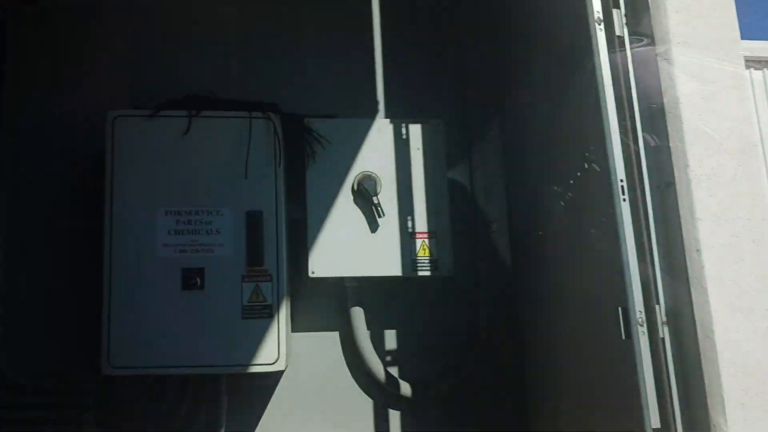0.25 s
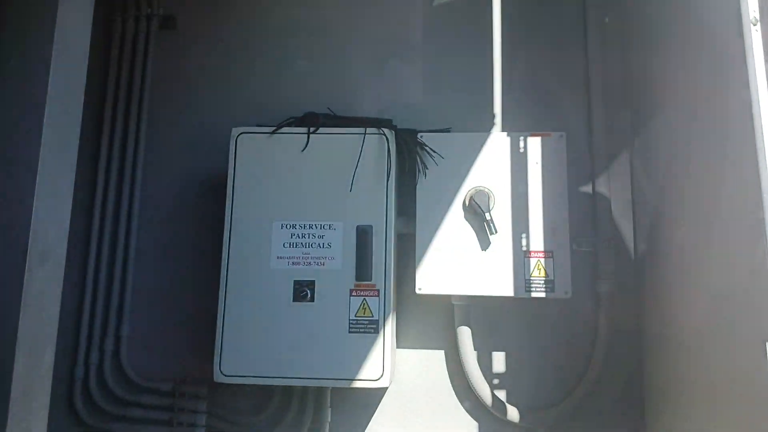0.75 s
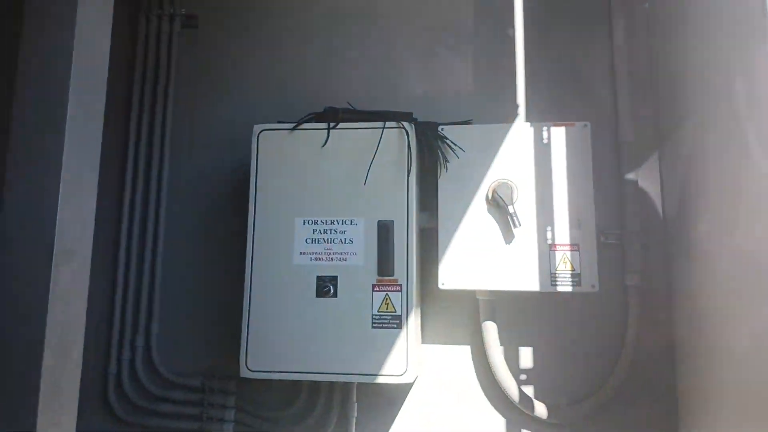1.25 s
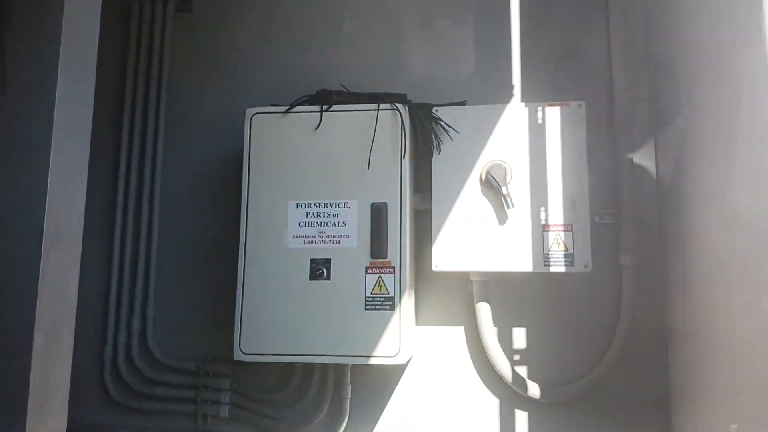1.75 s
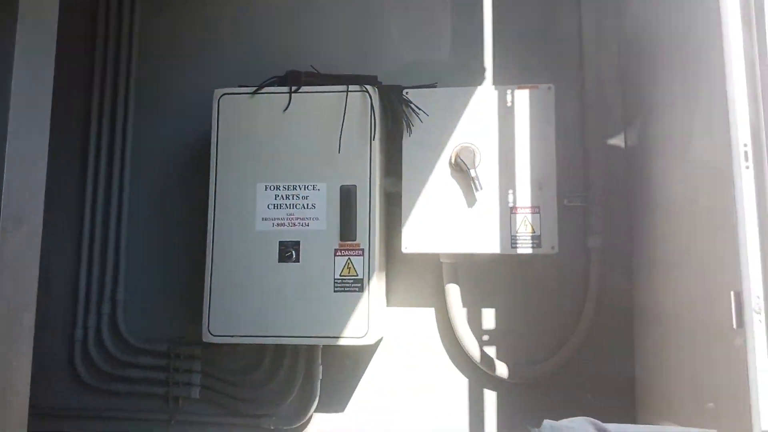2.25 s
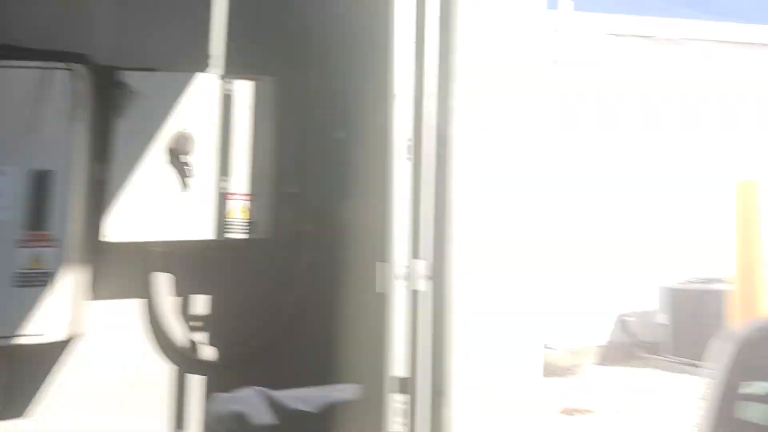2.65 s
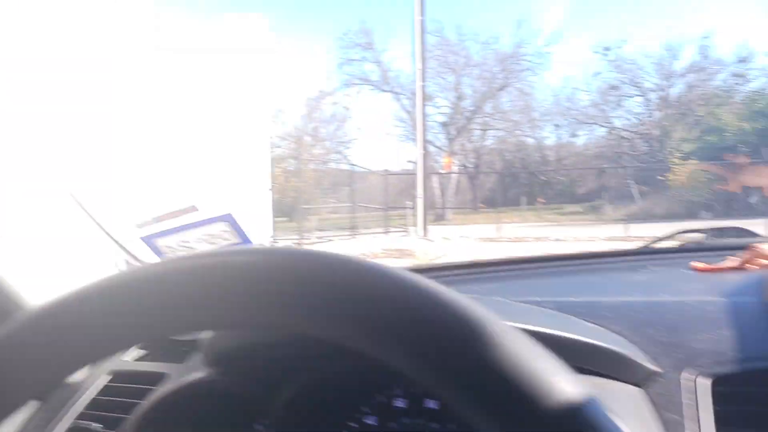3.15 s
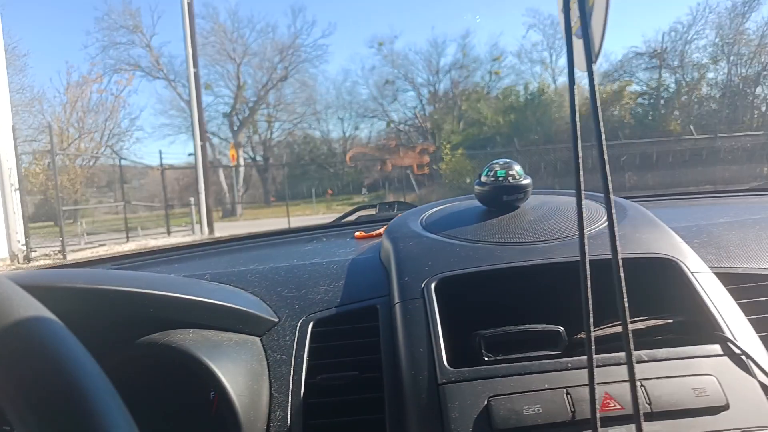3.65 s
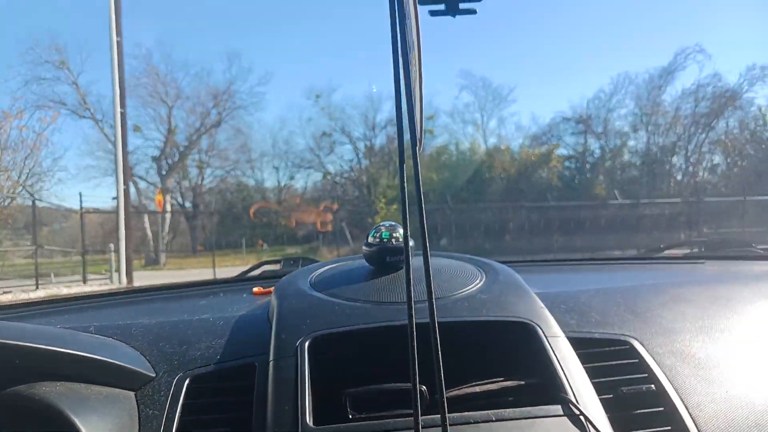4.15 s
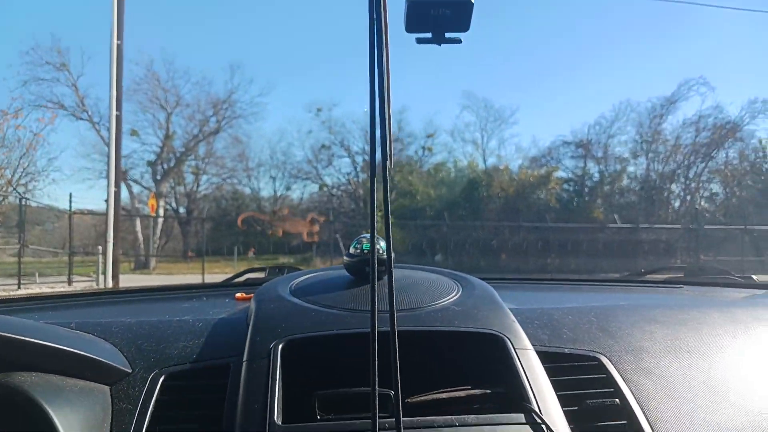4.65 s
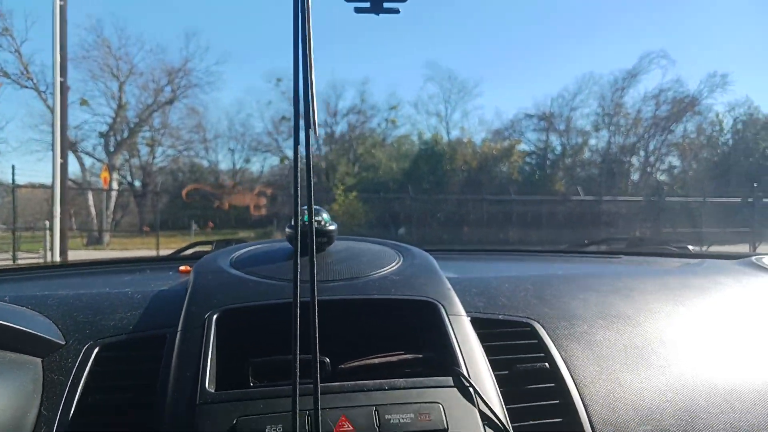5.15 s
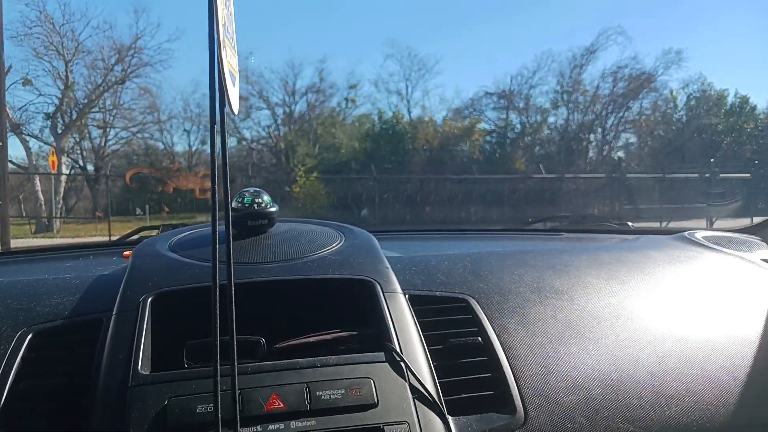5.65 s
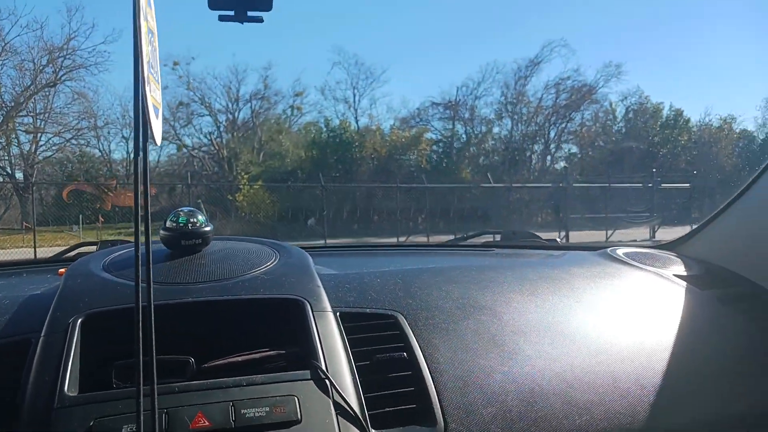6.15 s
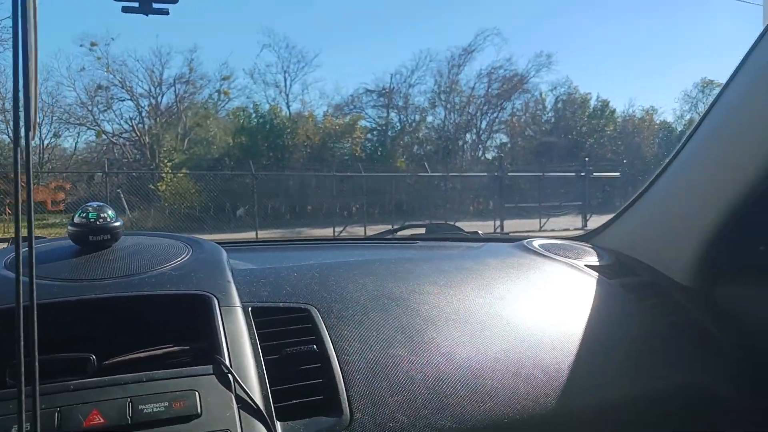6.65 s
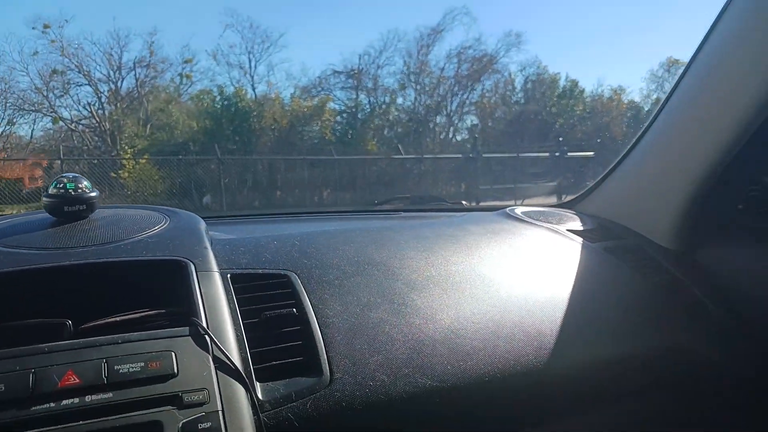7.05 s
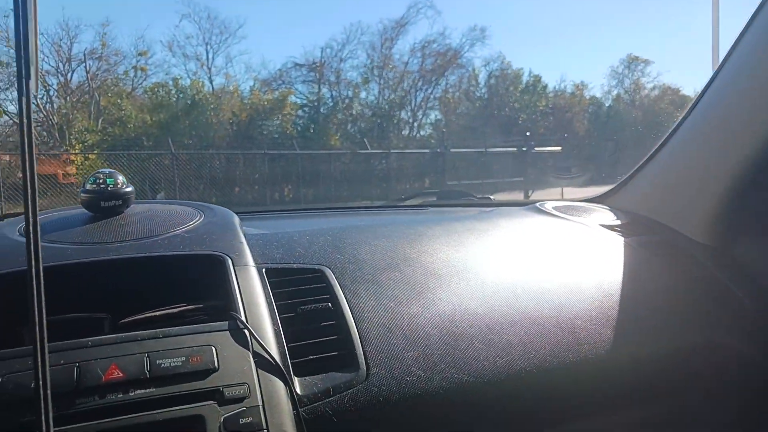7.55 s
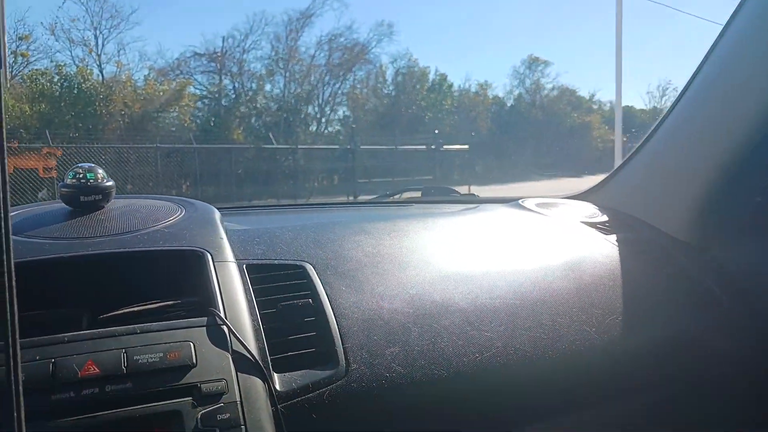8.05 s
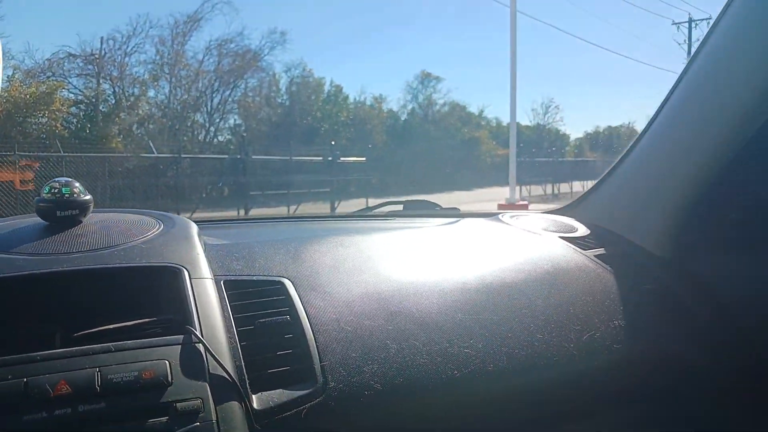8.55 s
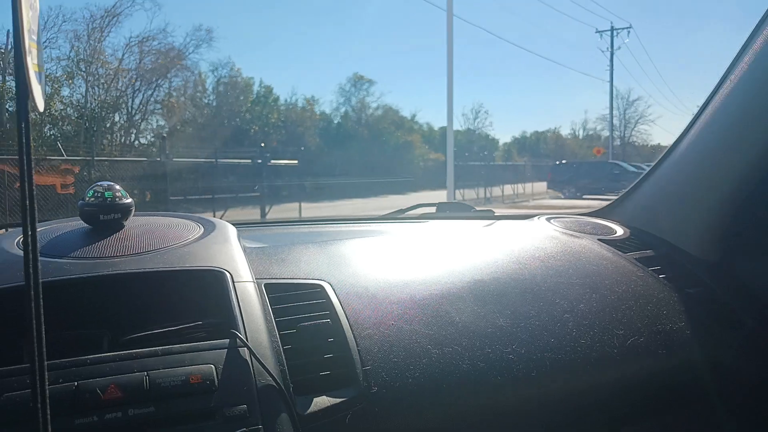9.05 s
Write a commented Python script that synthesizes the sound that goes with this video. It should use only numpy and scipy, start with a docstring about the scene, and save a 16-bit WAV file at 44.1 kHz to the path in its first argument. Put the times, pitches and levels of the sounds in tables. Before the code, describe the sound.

Heard on a hand-held phone inside a closed car: powerful dryer blowers drive a deep, booming, muffled roar with hiss past the window seals. After about three seconds it weakens as the car rolls out, with breathy gusts and a faint falling hum. The end is very quiet: soft hiss, low drone, a few dry plastic ticks and a hand rubbing the wheel.

```python
"""Car-wash dryer heard from inside the car

Blower jets drive the closed cabin: filtered noise gives the air boom, the roof, door and glass resonances
and the hiss past the seals, heard at two partly coherent ports of a hand-held phone.
As the car rolls out these fade through seal gusts and a sagging sine hum, leaving road drone, microphone
hiss, decaying thumps, grainy friction of a hand on the wheel and dry ticks made of noise and decaying sines."""
import sys
import numpy as np
from scipy import signal
from scipy.fft import rfft, irfft
from scipy.io import wavfile
from scipy.ndimage import uniform_filter1d

SR = 44100
rng = np.random.default_rng(int(sys.argv[2]) if len(sys.argv) > 2 else 0)


def generate_wav(signal):
    """Clip the signal to [-1, 1] and save it as 16-bit WAV at the path in sys.argv[1]."""
    frames = np.transpose(np.atleast_2d(signal))
    scaled = np.clip(frames, -1, 1) * 32767
    pcm = np.round(scaled).astype(np.int16)
    wavfile.write(sys.argv[1], SR, pcm)


N = 409688
T = np.arange(N) / SR
HZ = np.maximum(np.arange(N // 2 + 1) * SR / N, 1.)

# In mode and colour tables level_db is relative: air() sets the layer's own level.
# The two ports: hz, coherence (0-1), left_lead_rad, left_minus_right_db
PORTS = [(30, .98, .85, -2.8), (58, .98, .55, -1), (90, .9, .15, 0), (128, .98, -.15, -4.5),
         (180, .95, .4, -4), (250, .85, .35, .5), (350, .75, .3, -2.5), (500, .47, .3, -4),
         (700, .2, 1.5, -3), (1100, .14, 3.1, 0), (7000, .07, 3.1, -2), (9000, 0, 3.1, 2),
         (12500, 0, 3.1, 6), (15800, 0, 3.1, 3)]
# Nozzles moved behind the car: time_s, share (0-1)
BEHIND = [(3.15, 0.31), (3.7, 0.52), (4.6, 0.96), (5.4, 0.68)]
# Jets striking the car: time_s, panels_db, seals_db
JETS = [(0, 0, -1), (.5, -.2, 0.7), (1.2, 1, -3), (1.8, -1, -1.5), (2.3, -3.5, -6.5), (2.7, -9.5, -9.5),
        (3.15, -13.5, -16), (3.55, -15.5, -19.5), (4.0, -23, -18.5), (4.7, -29, -33.5), (5.3, -36, -28),
        (6.5, -56, -65)]
# Roar of the blowers all round the car: time_s, level_db
ROAR = [(0, -3.5), (.5, -4), (1.2, 1.3), (1.9, -4), (2.7, -2.5), (3.15, -2.6), (3.55, -3), (4.0, -4.5),
        (4.3, -5.5), (4.7, -6.5), (5.23, -6), (5.38, -11), (5.75, -14.5), (6.1, -15), (6.5, -18),
        (7.1, -22.5), (7.5, -23), (8.1, -25.5), (8.5, -37), (9.29, -32.5)]
# Drive of each layer: jets_db, db_per_jet_db, roar_db, db_per_roar_db, behind_lift_db, road_db
DRIVE = {"boom": (-23, 0.5, -22.5, 1.17, 2, -43.5), "roof": (-21, 0.62, -34.5, 0.96, 0.5, -64.5),
         "upper roof": (-21.5, 0.94, -41, 7, .1, -73.5), "door": (-29.5, 1.4, -44.5, 1.27, 11, -67),
         "glass": (-33.5, 2.07, -42.5, 0.85, 4, -77), "low hiss": (-50.5, 1, -56, 1.5, 3.5, -110),
         "high hiss": (-54.5, 0.9, -57.5, 1, -8, -110), "top hiss": (-58, 1, -77.5, 4, -1.5, -110)}

# Cabin air modes, nozzles near: hz, width_hz, level_db
BOOM_MODES = [(46.2, 23, -12), (59.8, 35.4, 0), (82, 31, -17.5)]
# Cabin air modes, nozzles behind: hz, width_hz, level_db
BOOM_BEHIND_MODES = [(41, 30, -3.5), (60, 20, -6.5), (80, 25, -19)]
# Brief swells and sags of the boom: start_s, length_s, lift_db
BOOM_SWELLS = [(0.237, 0.027, 5.5), (0.644, 0.05, 5.5), (2.058, 0.028, 3), (2.905, 0.35, 3.5),
               (3.625, 0.059, 1), (3.882, 0.18, 4), (4.41, 0.043, 4), (4.623, 0.12, 7), (5.053, 0.14, 2.5),
               (5.572, 0.14, 4.5), (5.76, 0.031, -10), (5.864, 0.37, 7.5), (6.73, 0.073, 5.5),
               (6.995, 0.094, -6), (7.303, 0.14, 4), (8.126, 0.091, 6), (8.51, .05, -4.5), (8.62, 0.027, 7)]
SWELL_EDGE_S = 0.082  # time for the lift to fall to a tenth
# Roof mode, nozzles near: hz, width_hz, level_db
ROOF_MODES = [(120.9, 28, 0)]
# Roof modes, nozzles behind: hz, width_hz, level_db
ROOF_BEHIND_MODES = [(114, 33, -1), (137, 28, -2.5)]
# Upper roof modes: hz, width_hz, level_db
UPPER_ROOF_MODES = [(155.5, 33.5, -1.5), (179.1, 28.4, 0.5)]
# Door modes, nozzles near: hz, width_hz, level_db
DOOR_MODES = [(214.3, 23, -1), (244.5, 38, -0.16), (286.4, 66, -1.1)]
# Door modes, nozzles behind: hz, width_hz, level_db
DOOR_BEHIND_MODES = [(225, 6.8, -5), (257, 67, -2), (300, 63, -6)]
JETS_REACH_DOOR_S, DOOR_EARLY_DB, ROOF_EARLY_DB = 0.82, -6.5, 4  # the jets start on the roof
# Window glass modes, nozzles near: hz, width_hz, level_db
GLASS_MODES = [(379, 101, 3.5), (440, 164, -1), (570, 210, -12), (730, 300, -27.5)]
# Window glass modes, nozzles behind: hz, width_hz, level_db
GLASS_BEHIND_MODES = [(375, 200, -2), (458, 67, -1.5), (536, 87, -3.5), (643, 53, -11.5), (706, 123, -13.5)]
# Tyre drone in the floor: hz, width_hz, level_db
ROAD_MODES = [(232, 19, 3.5), (300, 30, 4.5), (590, 110, -3.5)]
ROAD_DB = -67

# Low seal hiss, nozzles near: hz, level_db (per Hz)
LOW_HISS = [(500, -25.5), (750, -8.5), (1100, -4.5), (1500, -7), (2000, -9.5), (2600, -17), (4000, -34)]
# Low seal hiss modes, nozzles behind: hz, width_hz, level_db
LOW_HISS_BEHIND_MODES = [(774, 320, 13.5), (1300, 600, -11.5), (2620, 580, -15)]
# High seal hiss, nozzles near: hz, level_db (per Hz)
HIGH_HISS = [(1500, -19), (2300, 0), (3000, 2), (3800, 1), (4600, 0.5), (5500, -9.5), (8000, -32)]
# High seal hiss modes, nozzles behind: hz, width_hz, level_db
HIGH_HISS_REAR_MODES = [(2560, 1300, -6), (3730, 1500, -1.5), (4520, 930, -6)]
# Ridges in the hiss as nozzles pass the rear side windows: hz, width_hz, level_db
RIDGE_MODES = [(2870, 630, -1), (4400, 400, -4)]
RIDGE_S, RIDGE_HOLD_S, RIDGE_EDGE_S, RIDGE_DB = 3.5, 0.74, 0.61, -66.5  # edge: s per 20 dB
# Top seal hiss: hz, level_db (per Hz)
TOP_HISS = [(4000, -28), (5200, -1), (6500, -1.5), (7300, -5), (8200, -10), (10000, -14.5), (12300, -24),
            (15800, -30)]
# Sizzle above the top hiss: hz, level_db (per Hz)
SIZZLE = [(8000, -19.5), (10000, -2.5), (12500, 0), (15800, -7.5)]
SIZZLE_START_DB, SIZZLE_FADE_DB_PER_S = -64.5, 8.5
# Brief spits of treble: time_s, lift_db
SPITS = [(.664, 9), (0.8472, 8), (.958, 4.5), (1.1154, 11.5), (1.172, 8), (1.202, 7), (1.285, 1),
         (1.313, 7), (1.403, 6), (1.684, 7), (1.864, 4)]
SPIT_DECAY_S = 0.063  # time for the lift in dB to fall to a thousandth
# Left minus right: at first, added with the nozzles behind, added after OUTSIDE_S
HISS_PAN_DB, HISS_PAN_BEHIND_DB, HISS_PAN_OUTSIDE_DB, OUTSIDE_S = -0.5, 4, 1.5, 4.8

# Microphone hiss: hz, level_db (per Hz)
MIC_HISS = [(700, -6), (1000, -0.5), (2000, -9), (6000, -12), (10000, -9.5), (11500, -10), (13200, -6),
            (15800, -8)]
# Balance of the microphone hiss: hz, left_minus_right_db
MIC_HISS_PAN = [(900, 8), (5000, 4.5), (9000, 7), (13000, 6)]
# Microphone hiss, rising until 6 s and then sinking slightly: time_s, level_db
MIC_HISS_LEVEL = [(3.5, -92), (4.6, -78), (6.0, -73.5), (8.0, -76), (9.2, -80.5)]
# Faint electronic tone, level before panning: hz, level_db (over the hiss)
WHINE = [(11712, -23)]

# Trim ticks, dull and top relative to the bright burst:
# start_s, level_db, left_minus_right_db, dull_db, top_db, t60_s
TICKS = [(4.2924, -47.5, -15, -5.5, -9, 0.008), (5.467, -79, 4, 10, -10, .06),
         (6.0516, -68.5, 8, 12.5, -15, 0.045), (6.175, -81, 11, 15, -7, .045),
         (6.3691, -77, 3.5, -8, 9, 0.086), (6.5974, -73, 6, -9, 7, .07), (7.023, -61, 6, -11, 2, .034),
         (7.266, -69, 5.5, 2, 6, .07), (7.498, -61, 0, -22, -6, .04), (7.5957, -77, 4, 7, -3, 0.044),
         (7.7902, -45, 0.5, -11, 5, 0.044), (7.8394, -73.5, 6, 5, -9, 0.033), (7.925, -59, 4, -2, 6, 0.062),
         (8.082, -70, 2, -2, -2, 0.054), (8.185, -71, 8, -5, -10, .03), (8.192, -66.5, 7, -24, 7, 0.06),
         (8.298, -79, -1, -5, -14, .04), (8.371, -45.5, 0, -15, 6.5, 0.043),
         (8.502, -74.5, 3, -18, 11, 0.049), (9.126, -74.5, 1, -2, -7, .06)]
# Bright part of a tick: hz, level_db (per Hz)
TICK_BRIGHT = [(1500, -22), (3000, 3), (4000, 3.5), (6000, 2), (8000, -0.5), (10000, -3.5)]
# Top part of a tick: hz, level_db (per Hz)
TICK_TOP = [(6500, -25), (8500, -3), (10500, -4), (13000, 0), (15800, -3)]
# Dull modes of a tick: hz, width_hz, level_db
TICK_DULL_MODES = [(646, 190, 6.5), (960, 390, -2), (1476, 120, -0.5), (1700, 500, -5.5), (2300, 600, -10)]
# Cabin response after a tick: hz, width_hz, level_db
TICK_TAIL_MODES = [(1000, 900, 2), (2300, 1600, 1), (4300, 3000, 0)]
# Trim modes before scatter: hz, level_db (relative), t60_s (at most the tick's own)
TRIM_MODES = [(1480, -20, .05), (3300, -8, .03), (4900, -5, .02), (6850, 0, 0.043), (9100, -2, .011),
              (10780, -10, .04), (12500, -3, .04), (14620, -5, .024)]
TRIM_DB, TRIM_SCATTER_DB, TRIM_DETUNE = -7, 3.5, 0.044  # each tick strikes the modes differently
CRACK_T60_S, CRACK_DB = .003, 4
TICK_TAIL_T60_S, TICK_TAIL_DB, TICK_RIGHT_RISE_S = 0.24, -20, 0.0013
TICK_BOUNCE_S, TICK_BOUNCE_DB = 0.0029, -9  # the trim lands a second time

# Gusts along the rear seals: start_s, length_s, rise_s (per 20 dB), lower_db, upper_db, whistle_db
GUSTS = [(4.47, .2, .45, -65, -80, -67), (4.74, .27, .5, -59, -64, -64), (4.84, .07, .15, -62, -59, -72),
         (4.96, .05, .1, -60, -63, -66), (5.155, .02, .06, -53, -60, -62), (5.2, .07, .05, -65, -69, -64),
         (5.3, .1, .05, -67, -84, -73), (5.47, .03, .04, -63, -76, -72), (5.55, .1, .08, -64, -73, -72),
         (5.75, .22, .2, -74, -90, -76), (6.0, .28, .15, -72, -88, -77), (6.052, .015, .02, -66, -72, -72),
         (6.19, .03, .03, -73, -84, -84)]
LOWER, UPPER, WHISTLE = 3, 4, 5  # columns of the gusts
# Lower gap modes: hz, width_hz, level_db
GUST_LOWER_MODES = [(776, 460, 2), (1150, 230, -1.2), (1340, 200, -0.5), (1630, 150, -5)]
# Upper gap modes: hz, width_hz, level_db
GUST_UPPER_MODES = [(1640, 360, -1), (1870, 150, 1.5), (2040, 260, -5)]
# Whistle band of the gusts: hz, width_hz, level_db
GUST_WHISTLE_MODES = [(2700, 1000, -2), (3620, 860, 0), (4220, 700, -6.5), (5460, 700, -12.5)]
GUST_FALL_S, GUST_FALL_PER_LENGTH = 0.019, 0.98  # 20 dB down after this, longer gusts die slower
GUST_LOW_HISS_DB, GUST_ROOF_DB = 5, 18.5  # over the upper modes
GUST_TOP_HISS_DB = -16  # over the whistle band

# Blower hum sagging as the car leaves; rise and fall in s per 20 dB
HUM_PEAK_S, HUM_HOLD_S, HUM_RISE_S, HUM_FALL_S = 5.65, 1.05, 1.4, .5
HUM_HZ, HUM_SAG_HZ_PER_S, HUM_DB = 274, 28, -54

# Soft thumps of a door panel: start_s, peak_db
THUMPS = [(6.053, -41), (7.599, -55), (7.838, -48), (8.029, -51)]
THUMP_HZ, THUMP_T60_S = 477, 0.088
# The panel drones on the road; edge in s per 20 dB
PANEL_S, PANEL_HOLD_S, PANEL_EDGE_S, PANEL_DB, PANEL_WIDTH_HZ = 6.83, 1.12, 0.62, -60.5, 125

# Strokes of the hand on the wheel, before panning: start_s, length_s, bright_db, dull_db
STROKES = [(6.624, .07, -76, -81), (6.725, 0.1, -71, -80.5), (6.873, .2, -66, -74.5),
           (6.992, 0.049, -79, -71.5), (7.1, 0.16, -69.5, -76.5), (7.268, 0.052, -69, -71),
           (7.361, 0.027, -62.5, -63.5), (7.424, 0.046, -70, -73), (7.501, 0.023, -67.5, -72)]
STROKE_RISE_S, STROKE_FALL_S = 0.049, 0.065  # per 20 dB
# Bright friction: hz, level_db (per Hz)
RUB_BRIGHT = [(4000, -18.5), (6500, -9), (9000, -6), (11000, -7.5), (13000, -4), (15800, -9.5)]
# Dull friction modes: hz, width_hz, level_db
RUB_DULL_MODES = [(1090, 940, -6.5), (1850, 790, -7), (2580, 470, -7), (3078, 330, -9), (3940, 1700, -5.5),
                  (6600, 1800, -11)]
# Skin catching on the rim, before panning: start_s, level_db
SNAGS = [(6.993, -66), (7.023, -58.5), (7.268, -76), (7.3, -71), (7.361, -66), (7.385, -62), (7.497, -62),
         (7.525, -72)]
SNAG_FALL_S = 0.015  # per 20 dB
# Rim modes rung by the catches: hz, width_hz, level_db
RIM_MODES = [(1880, 160, 2), (2640, 150, -11), (3100, 250, 2), (3760, 300, -2), (5640, 500, -8),
             (6640, 300, -7)]

MIC_LOW_HZ, TOP_HZ = 35.7, 15750
OVERLOAD = .62  # full scale is 1


def undb(db):
    """Amplitude ratio is ten to the power of decibels over twenty."""
    return 10 ** (np.asarray(db) / 20)


def over_hz(table):
    """Linear interpolation of a table's columns on a log-frequency axis."""
    hz, *columns = np.transpose(table)
    return [np.interp(np.log(HZ), np.log(hz), c) for c in columns]


def over_time(table):
    """Linear interpolation of a table's columns in time."""
    s, *columns = np.transpose(table)
    return [np.interp(T, s, c) for c in columns]


def modes(table):
    """Resonance: squared second-order responses add as powers; width is between the -6 dB points."""
    power = 0
    for hz, width, db in table:
        detuning = (HZ - hz ** 2 / HZ) / width
        power = power + undb(2 * db) / (1 + detuning ** 2) ** 2
    return np.sqrt(power)


def colour(table):
    """Spectral shaping: 40 dB down an octave below the table, level beyond its upper end."""
    low_hz, low_db = table[0]
    return undb(over_hz([(low_hz / 2, low_db - 40)] + list(table))[0])


def walk(rate):
    """Random modulation: levels held for 1 / rate s, smoothed twice, with spread near 1."""
    k = int(SR / rate)
    held = np.repeat(rng.standard_normal(N // k + 1), k)
    return 1.3 * uniform_filter1d(uniform_filter1d(held, k), k)[:N]


def air(gain, steady_s=0.12, flicker_db=0., flicker_hz=12):
    """Partial coherence: coloured noise at two ports, mid rms 1 over steady_s before its flicker."""
    coherence, lead, pan_db = over_hz(PORTS)
    coherence = np.clip(coherence, 0, 1)
    shared, separate = gain * rfft(rng.standard_normal((2, N)))
    right = coherence * np.exp(-1j * lead) * shared + np.sqrt(1 - coherence ** 2) * separate
    pair = irfft([shared * undb(pan_db / 2), right * undb(-pan_db / 2)], N)
    k = int(steady_s * SR)
    power = uniform_filter1d(uniform_filter1d(pair.mean(axis=0) ** 2, k), k)
    return pair / np.sqrt(power) * undb(flicker_db * walk(flicker_hz))


def sides(pan_db):
    """Level difference: gains of the left and right port, half the decibels each way."""
    return undb(np.outer([.5, -.5], pan_db))


def shifting(near, behind, pan_db=0., **noise):
    """Power crossfade: one layer changes colour as the nozzles pass to the rear."""
    share = np.clip(over_time(BEHIND)[0], 0, 1)
    front = np.sqrt(1 - share) * air(near, **noise)
    rear = np.sqrt(share) * air(behind, **noise) * sides(pan_db)
    return front + rear


def patchy(table, **noise):
    """Independent modulation: resonances swell and fade separately, rms near 1 in all."""
    weights = undb([db for *_, db in table]) * np.sqrt([width for _, width, _ in table])
    layers = sum(w * air(modes([mode]), **noise) for w, mode in zip(weights, table))
    return layers / np.linalg.norm(weights)


def surge(start, length, rise, fall):
    """Exponential envelope: rises, holds 1 for length s and falls; rise and fall are s per 20 dB."""
    before, after = (start - T) / rise, (T - start - length) / fall
    return undb(-20 * np.maximum(np.maximum(before, after), 0))


def driven(layer):
    """Power addition: jets, roar and road drive a layer as independent sources."""
    (panels_db, seals_db), (roar_db,) = over_time(JETS), over_time(ROAR)
    jet_db = seals_db if "hiss" in layer else panels_db
    full_db, per_jet, far_db, per_roar, behind_db, road_db = DRIVE[layer]
    jet = undb(full_db + per_jet * jet_db)
    roar = undb(far_db + per_roar * roar_db + behind_db * np.clip(over_time(BEHIND)[0], 0, 1))
    return np.sqrt(jet ** 2 + roar ** 2 + undb(road_db) ** 2)


def gust(column):
    """Power addition: overlapping gusts form the gain of one band."""
    power = 0
    for row in GUSTS:
        start, length, rise = row[:3]
        fall = GUST_FALL_S + GUST_FALL_PER_LENGTH * length
        power = power + (undb(row[column]) * surge(start, length, rise, fall)) ** 2
    return np.sqrt(power)


def steady(sos, x):
    """Steady-state filtering: the filter starts settled at the first sample."""
    settled = signal.sosfilt_zi(sos)[:, None] * x[None, :, :1]
    return signal.sosfilt(sos, x, zi=settled)[0]


def body():
    """Forced resonance: turbulence rings the cabin air and the panels at their own modes."""
    swell_db = sum(db * surge(s, length, SWELL_EDGE_S, SWELL_EDGE_S) for s, length, db in BOOM_SWELLS)
    cabin = driven("boom") * undb(swell_db)
    cabin = cabin * shifting(modes(BOOM_MODES), modes(BOOM_BEHIND_MODES), steady_s=0.72)

    roof = driven("roof") * shifting(modes(ROOF_MODES), modes(ROOF_BEHIND_MODES),
                                     steady_s=0.3, flicker_db=0.83, flicker_hz=7)
    early = np.clip(1 - T / JETS_REACH_DOOR_S, 0, 1)
    upper_gain = np.hypot(driven("upper roof") * undb(ROOF_EARLY_DB * early),
                          undb(GUST_ROOF_DB) * gust(UPPER))
    roof += upper_gain * air(modes(UPPER_ROOF_MODES), steady_s=0.3, flicker_db=1.5, flicker_hz=6.026)

    door = driven("door") * undb(DOOR_EARLY_DB * early)
    door = door * shifting(modes(DOOR_MODES), modes(DOOR_BEHIND_MODES), pan_db=-0.5,
                           steady_s=0.86, flicker_db=1.0, flicker_hz=4)
    glass = driven("glass") * shifting(modes(GLASS_MODES), modes(GLASS_BEHIND_MODES), pan_db=2.0,
                                       steady_s=0.15, flicker_db=1.34, flicker_hz=6)
    road = undb(ROAD_DB) * air(modes(ROAD_MODES))
    return cabin + roof + door + glass + road


def spits():
    """Impulsive modulation: each spit lifts the treble at once and lets it sink back."""
    lift_db = 0
    for s, db in SPITS:
        lift_db = lift_db + db * (T >= s) * undb(-60 * np.maximum(T - s, 0) / SPIT_DECAY_S)
    return undb(lift_db)


def jets():
    """Turbulent jet noise: broadband hiss past the seals leans left as the nozzles pass behind."""
    pan_db = HISS_PAN_DB + HISS_PAN_BEHIND_DB * over_time(BEHIND)[0] + HISS_PAN_OUTSIDE_DB * (T > OUTSIDE_S)
    low_gain = np.hypot(driven("low hiss"), undb(GUST_LOW_HISS_DB) * gust(UPPER))
    low = low_gain * shifting(colour(LOW_HISS), modes(LOW_HISS_BEHIND_MODES), flicker_db=1.5, flicker_hz=7)

    high = driven("high hiss") * shifting(colour(HIGH_HISS), modes(HIGH_HISS_REAR_MODES), flicker_db=1.35)
    ridge_gain = undb(RIDGE_DB) * surge(RIDGE_S, RIDGE_HOLD_S, RIDGE_EDGE_S, RIDGE_EDGE_S)
    high += ridge_gain * air(modes(RIDGE_MODES))

    treble_lift = spits()
    top_gain = np.hypot(driven("top hiss"), undb(GUST_TOP_HISS_DB) * gust(WHISTLE))
    top = top_gain * treble_lift * air(colour(TOP_HISS), flicker_db=.4, flicker_hz=25)
    sizzle_gain = undb(SIZZLE_START_DB - SIZZLE_FADE_DB_PER_S * T) * treble_lift
    sizzle = sizzle_gain * air(colour(SIZZLE), flicker_db=1.0)
    return (low + high + top + sizzle) * sides(pan_db)


def quiet():
    """Self-noise: microphone hiss, brighter at the left port, and a faint phase-wandering sine."""
    hiss = air(colour(MIC_HISS), steady_s=.5)
    hiss = irfft(rfft(hiss) * sides(over_hz(MIC_HISS_PAN)[0]), N)
    tone = 0
    for hz, db in WHINE:
        phase = 2 * np.pi * hz * T + 1.4 * walk(60)
        tone = tone + undb(db) * np.sqrt(2) * np.sin(phase)
    return undb(over_time(MIC_HISS_LEVEL)[0]) * (hiss + tone * sides(26.0))


def ticks():
    """Impact excitation: crack, trim ring, burst and bounce; reflections swell at the right port."""
    crackle = undb(np.where(walk(400) > 0, 1.5, -3.5))
    bright = crackle * air(colour(TICK_BRIGHT))
    top = crackle * air(colour(TICK_TOP))
    dull, cabin = air(modes(TICK_DULL_MODES)), air(modes(TICK_TAIL_MODES))
    out, t = np.zeros((2, N)), np.arange(int(.15 * SR)) / SR
    mode_hz, mode_db, mode_t60 = np.transpose(TRIM_MODES)[:, :, None]
    strikes = rng.standard_normal((len(TICKS), 2, len(TRIM_MODES), 1))
    crack = undb(CRACK_DB - 60 * t / CRACK_T60_S)
    tail = undb(TICK_TAIL_DB - 60 * t / TICK_TAIL_T60_S)
    rise = np.array([np.ones(len(t)), 1 - np.exp(-t / TICK_RIGHT_RISE_S)])
    for (s, db, pan_db, dull_db, top_db, t60), (detune, scatter) in zip(TICKS, strikes):
        at = slice(int(s * SR), int(s * SR) + len(t))
        # The bounce restarts the same decay later and softer
        bounce = (t > TICK_BOUNCE_S) * undb(TICK_BOUNCE_DB + 60 * TICK_BOUNCE_S / t60)
        fall = undb(-60 * t / t60) * (1 + bounce)
        burst = (bright[:, at] + undb(top_db) * top[:, at]) * (crack + fall)
        burst += cabin[:, at] * tail
        burst += undb(dull_db) * dull[:, at] * (fall + 5.9 * tail)
        ring_gain = undb(mode_db + TRIM_SCATTER_DB * scatter - 60 * t / np.clip(mode_t60, .005, t60))
        ring_hz = mode_hz * (1 + TRIM_DETUNE * detune)
        burst += undb(TRIM_DB) * np.sum(ring_gain * np.sin(2 * np.pi * ring_hz * t), axis=0)
        out[:, at] += undb(db) * sides(pan_db) * rise * burst
    return out


def hum():
    """Frequency modulation: a wavering, sagging sine, alike at both ports."""
    hz = HUM_HZ - HUM_SAG_HZ_PER_S * (T - HUM_PEAK_S)
    phase = 2 * np.pi * np.cumsum(hz + 15. * walk(40)) / SR
    gain = surge(HUM_PEAK_S, HUM_HOLD_S, HUM_RISE_S, HUM_FALL_S) * undb(HUM_DB + 3.5 * walk(25))
    return gain * np.sqrt(2) * np.sin(phase)


def gusts():
    """Flow-excited resonance: air surging through the rear seals rings gap modes unevenly."""
    lower = gust(LOWER) * patchy(GUST_LOWER_MODES, flicker_db=1.7, flicker_hz=20)
    upper = gust(UPPER) * patchy(GUST_UPPER_MODES, flicker_db=1.7, flicker_hz=20)
    whistle = gust(WHISTLE) * air(modes(GUST_WHISTLE_MODES), flicker_db=1.2, flicker_hz=20)
    return (lower + upper) * sides(2.8) + whistle * sides(1.7)


def thumps():
    """Damped oscillation: a door panel rings down at each thump and drones roughly at the same mode."""
    out, t = np.zeros(N), np.arange(int(.2 * SR)) / SR
    envelope = (1 - np.exp(-t / 0.0044)) * undb(-60 * t / THUMP_T60_S)
    ring = envelope * np.sin(2 * np.pi * THUMP_HZ * t)
    for s, db in THUMPS:
        out[int(s * SR):int(s * SR) + len(t)] += undb(db) * ring / ring.max()
    drone = air(modes([(THUMP_HZ, PANEL_WIDTH_HZ, 0)]), flicker_db=1.5, flicker_hz=26)
    drone_gain = undb(PANEL_DB) * surge(PANEL_S, PANEL_HOLD_S, PANEL_EDGE_S, PANEL_EDGE_S)
    return out + drone_gain * drone


def rub():
    """Friction: skin on the wheel rim gives grainy noise and short catches, nearer the left port."""
    powers = np.array([surge(s, length, STROKE_RISE_S, STROKE_FALL_S) ** 2 for s, length, *_ in STROKES])
    levels_db = np.array(STROKES)[:, 2:].T
    bright_gain, dull_gain = np.sqrt(undb(2 * levels_db) @ powers)
    bright = bright_gain * air(colour(RUB_BRIGHT), flicker_db=1.5, flicker_hz=260) * sides(4.3)
    dull = dull_gain * air(modes(RUB_DULL_MODES), flicker_db=1.5, flicker_hz=119) * sides(8.9)
    snag_gain = sum(undb(db) * surge(s, 0.0035, 0.0018, SNAG_FALL_S) for s, db in SNAGS)
    return bright + dull + snag_gain * air(modes(RIM_MODES)) * sides(6.7)


def scene():
    """Superposition: the pressures of all sources add in the cabin."""
    return body() + jets() + quiet() + hum() + ticks() + gusts() + thumps() + rub()


def record(dry):
    """Band limiting and overload: deep bass is cut, the largest swings are flattened, the top is cut."""
    mic = steady(signal.butter(2, MIC_LOW_HZ, "high", fs=SR, output="sos"), dry)
    excess = np.maximum(np.abs(mic) - OVERLOAD, 0)
    bent = mic - 0.24 * np.sign(mic) * excess
    return steady(signal.ellip(12, .2, 80, TOP_HZ, fs=SR, output="sos"), bent)


dry = scene()
out = record(dry)
generate_wav(out)
```